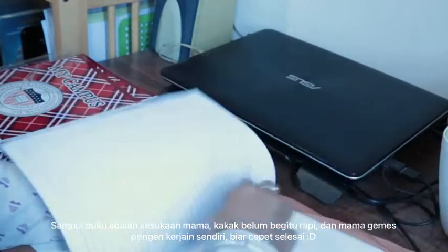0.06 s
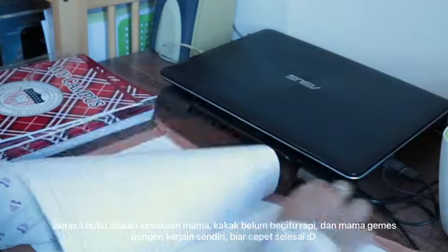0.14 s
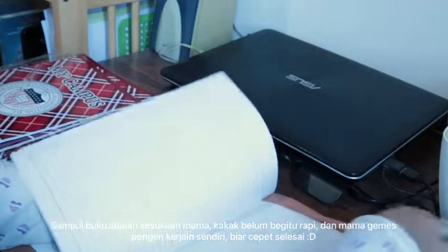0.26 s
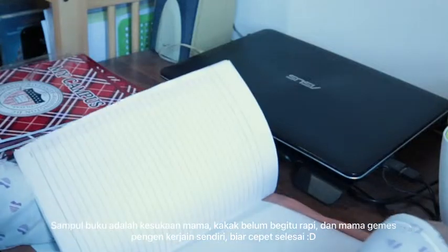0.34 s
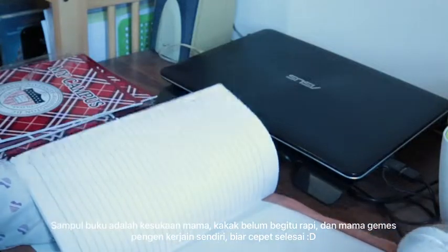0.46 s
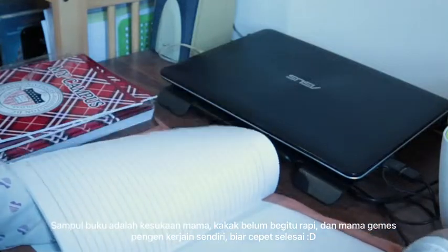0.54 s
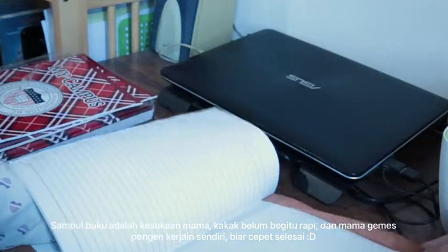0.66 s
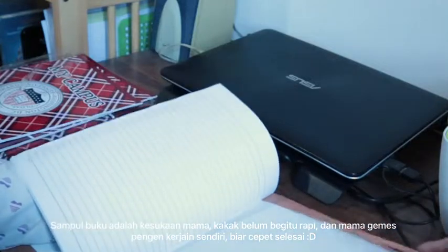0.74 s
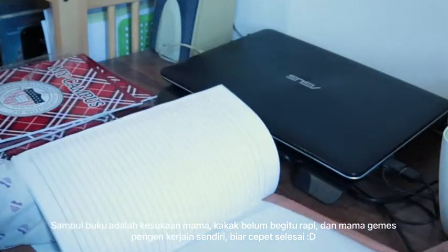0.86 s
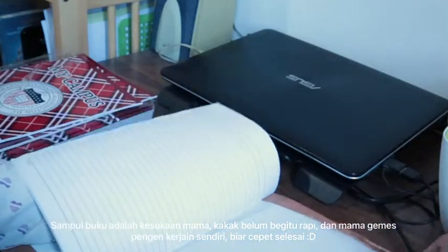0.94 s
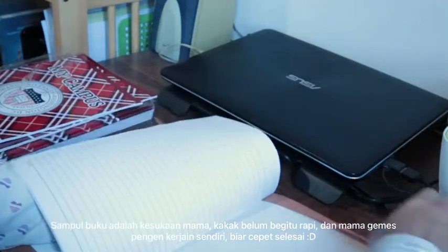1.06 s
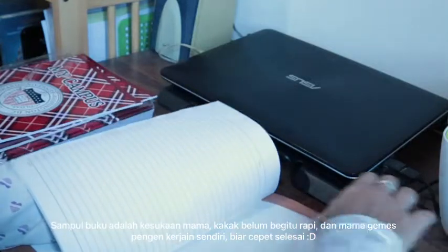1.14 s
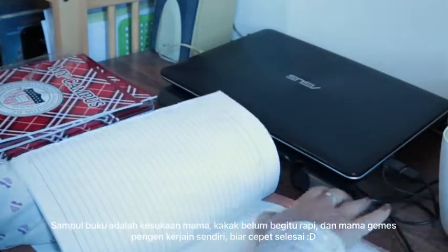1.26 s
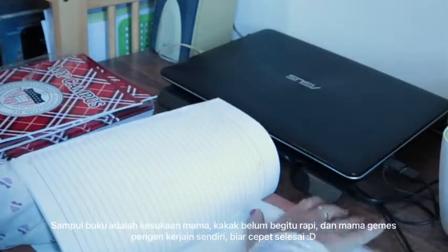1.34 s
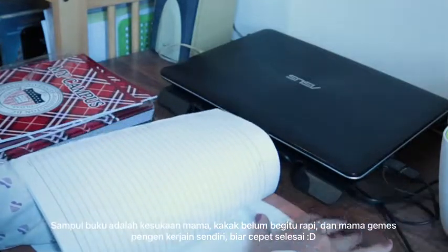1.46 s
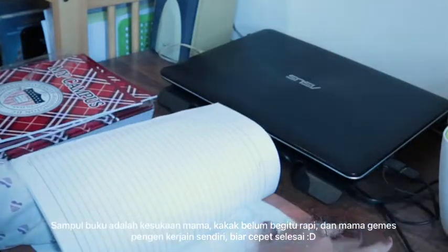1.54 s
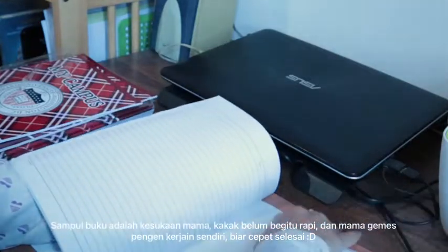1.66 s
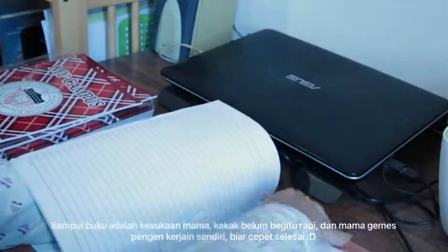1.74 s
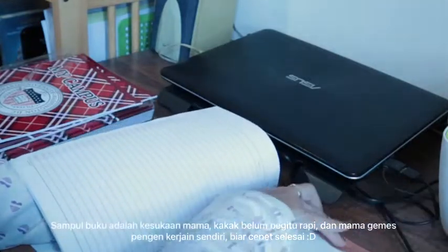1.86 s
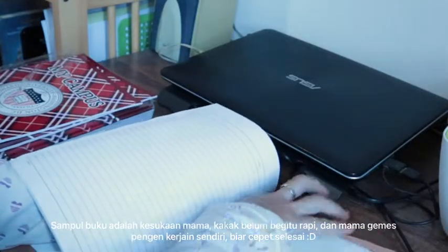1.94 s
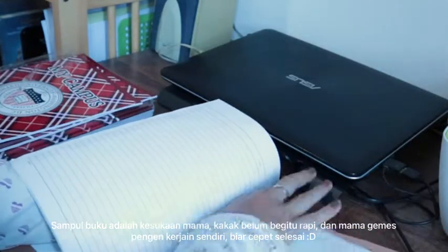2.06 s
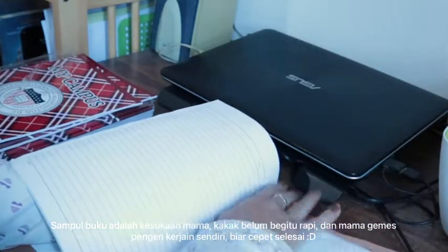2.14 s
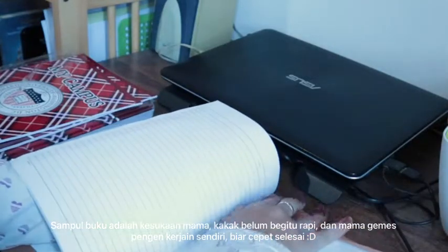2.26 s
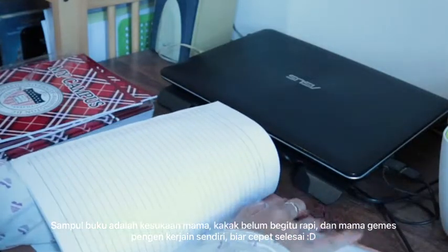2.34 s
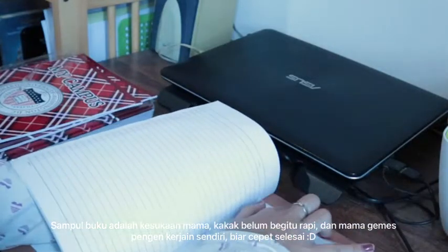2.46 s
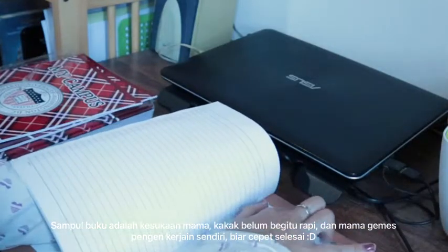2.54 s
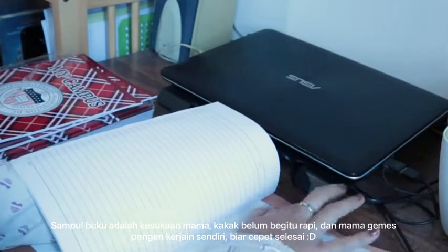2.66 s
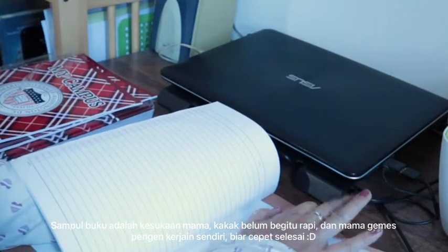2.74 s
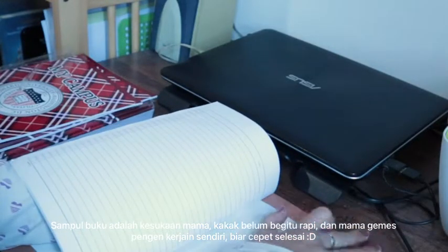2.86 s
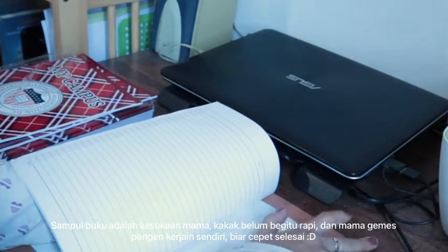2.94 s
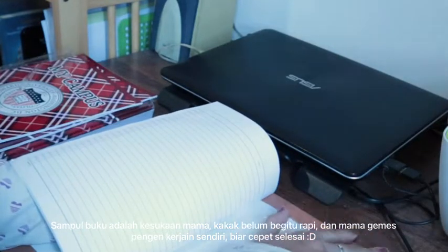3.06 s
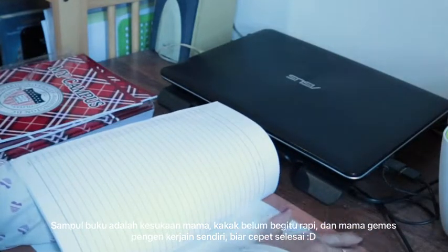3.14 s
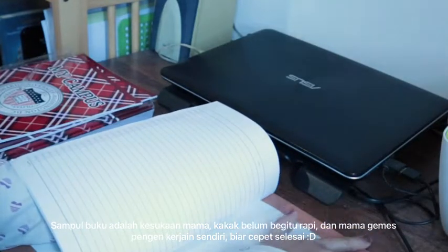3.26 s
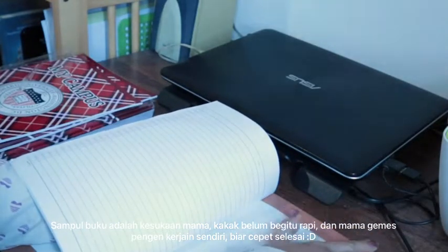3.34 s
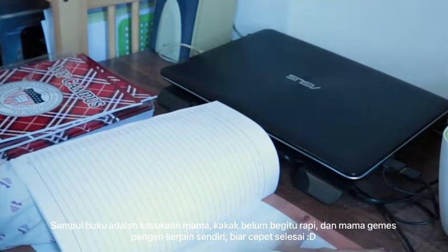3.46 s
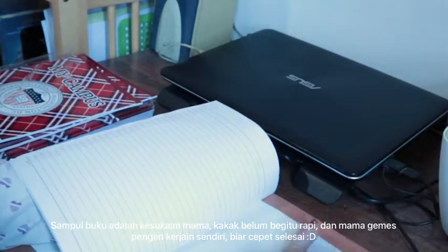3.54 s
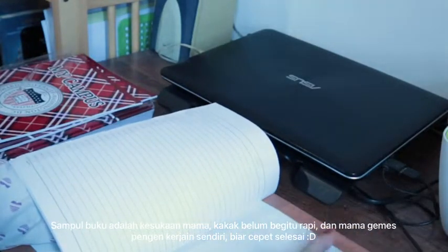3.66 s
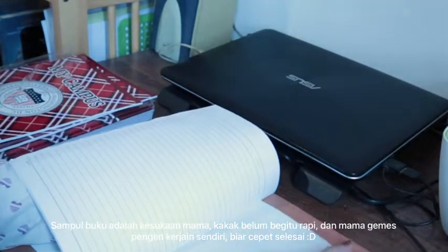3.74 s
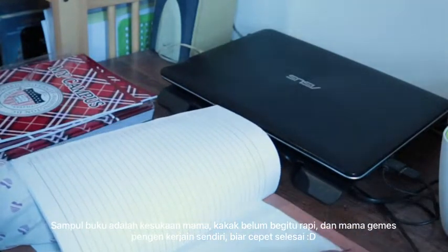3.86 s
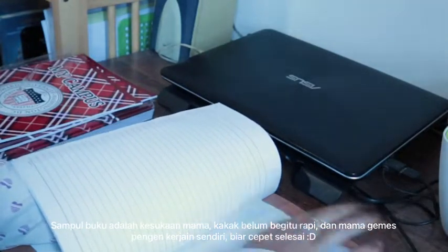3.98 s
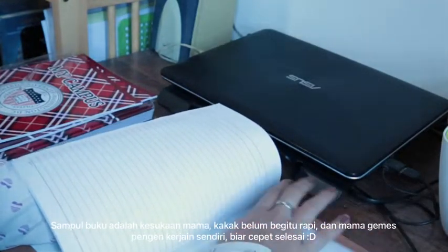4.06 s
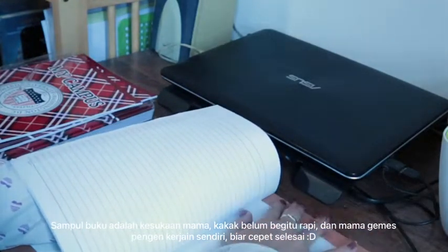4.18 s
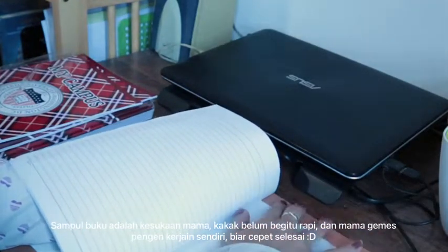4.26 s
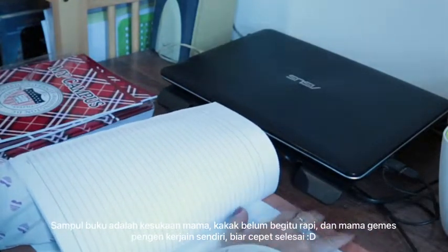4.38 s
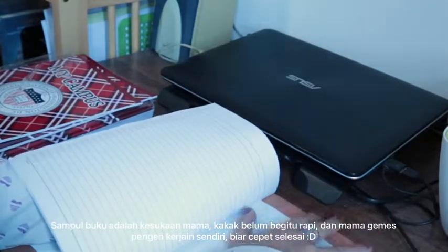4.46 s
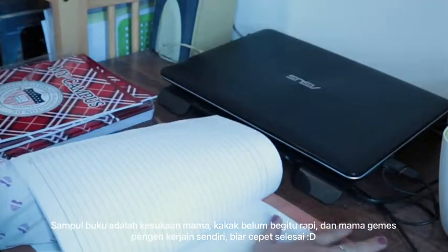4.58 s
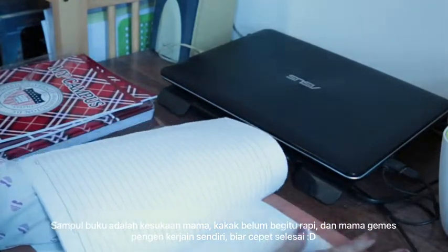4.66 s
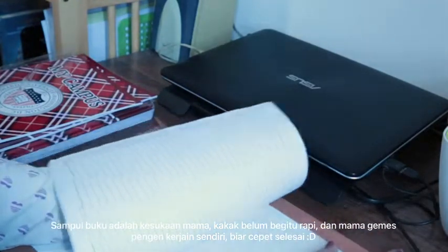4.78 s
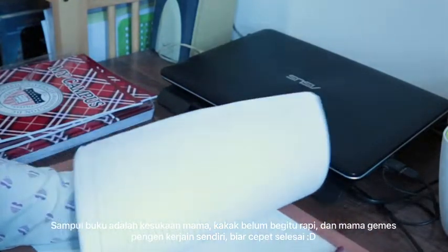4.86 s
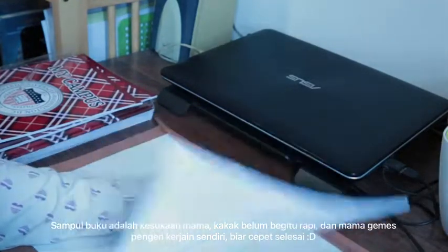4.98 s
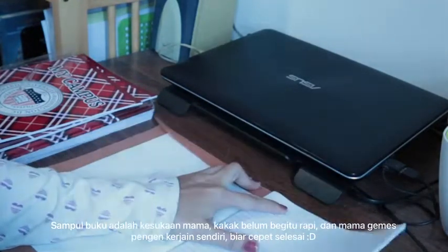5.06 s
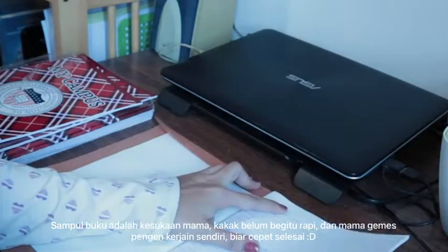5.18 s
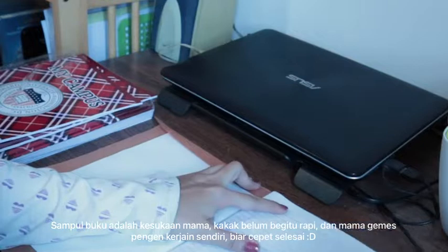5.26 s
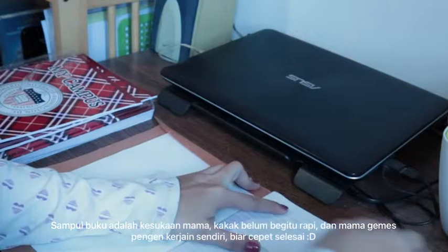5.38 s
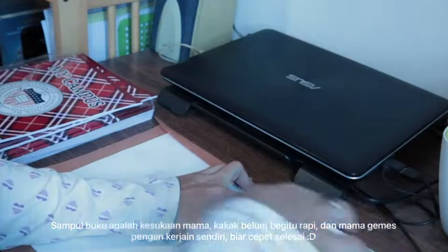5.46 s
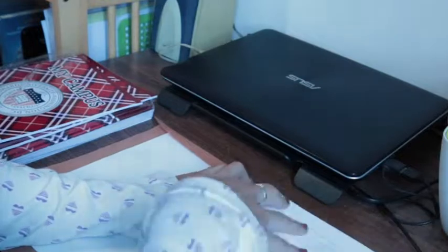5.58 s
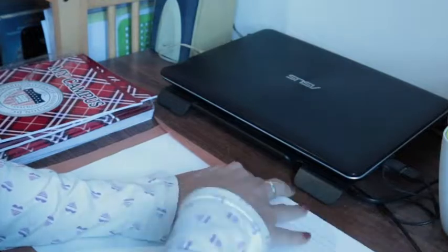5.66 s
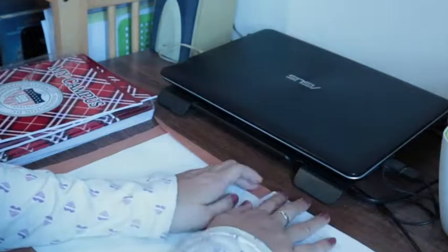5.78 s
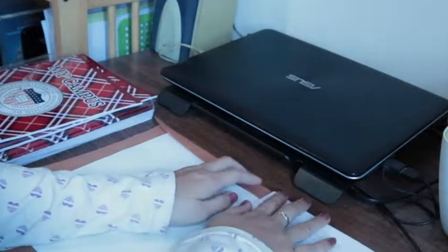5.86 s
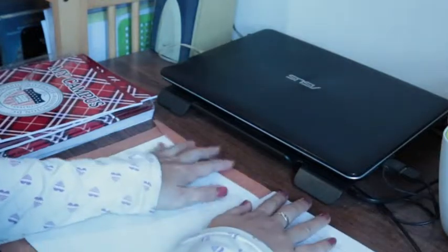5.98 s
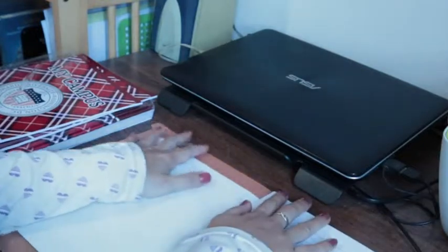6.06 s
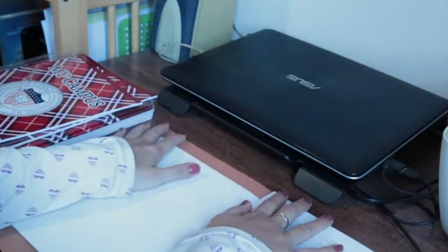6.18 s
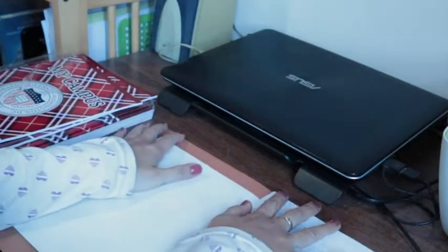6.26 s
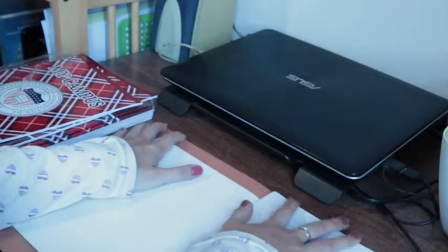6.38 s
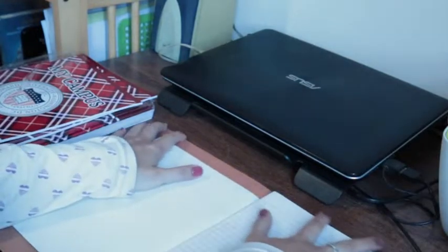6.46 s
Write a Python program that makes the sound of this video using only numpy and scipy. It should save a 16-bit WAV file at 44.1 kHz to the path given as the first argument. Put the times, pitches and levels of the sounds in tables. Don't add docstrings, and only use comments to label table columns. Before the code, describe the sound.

Close up, sheets of paper rustle, crackle and pop under moving hands, then a notebook slaps down on a wooden desk and palms smooth it.

```python
import sys
import numpy as np
from scipy import signal
from scipy.fft import rfft, irfft, next_fast_len
from scipy.io import wavfile
from scipy.ndimage import uniform_filter1d

SR = 44100
rng = np.random.default_rng(int(sys.argv[2]) if len(sys.argv) > 2 else 0)


def ratio(d):
    e = np.asarray(d, float) / 20
    return 10 ** e


def inscribe(sig):
    pcm = np.round(np.clip(np.atleast_2d(sig).T, -1, 1) * 32767)
    wavfile.write(sys.argv[1], SR, pcm.astype(np.int16))


N = 287091
STEP = 32

# [f/Hz, density/dB per Hz]
HUM_SPECTRUM = [(18, -38), (30, -12), (83, -1.5), (337, -3.5), (394, -3.5), (928, -13), (1870, -18),
                (3320, -22), (8040, -30), (11600, -34), (12500, -35), (13500, -61), (15000, -78)]
HUM_DB = -49
# [f/Hz, density/dB per Hz]
SHEET_SPECTRUM = [(700, -48), (1200, -5.5), (2000, -1), (3000, -3.5), (4000, -15), (5500, -36)]
FINE_SPECTRUM = [(4500, -9), (6500, -14.5), (8500, -11), (11200, -9), (12800, -15), (14300, -24.5),
                 (15300, -40)]
FLUTTER_SPECTRUM = [(150, 3.5), (300, 0.5), (700, -3), (1100, -5.5), (1500, -77)]
EDGE_SPECTRUM = [(2800, 2.5), (3800, 5.5), (5000, 0), (6500, -4), (8000, -14)]

# [start t/s, rise/s, fall/s, top level/dB, brightness/dB]
SWEEPS = [(0.0, 0.0025, 0.37, -40.5, -8), (.3, 0.18, 0.24, -51, -15), (.85, 0.085, 0.033, -39, -11),
          (1.1, 0.22, 0.22, -45.5, -27), (1.5, 0.27, 0.33, -45, -23), (1.78, 0.067, .05, -54.5, -0.5),
          (1.999, 0.012, 0.022, -52, 0.5), (2.2, 0.067, 0.066, -58.5, 6.5), (2.33, 0.076, 0.13, -52.5, -2),
          (2.48, 0.11, 0.16, -49.5, -5), (3.4, 0.14, 0.24, -46.5, -17), (3.62, .09, 0.058, -47.5, -6.5),
          (4.25, 0.21, .2, -50.5, -2), (4.5, .21, .1, -41.5, -4.5), (4.72, 0.11, 0.2, -48.5, -6.5),
          (5.42, 0.15, 0.13, -78, -19), (2.03, 0.093, 0.12, -52, -9), (5.1, 0.14, 0.14, -43.5, -22),
          (5.22, .13, 0.058, -51, 1), (5.62, 0.049, 0.093, -53, -6.5), (5.7, 0.064, 0.047, -50, -3.5),
          (5.849, 0.11, 0.18, -47.5, 2.5), (5.95, 0.17, 0.071, -49, -2), (6.26, 0.25, 0.37, -45.5, -3.5)]
# [start t/s, fall/s, top level/dB, brightness/dB]
CRUMPLES = [(0.108, 0.087, -38, -6.5), (.25, 0.11, -40, -3), (.57, 0.053, -39.5, -6.5),
            (.62, 0.16, -35, -16), (0.652, 0.08, -31, -4), (1.104, 0.17, -43.5, -7),
            (1.321, 0.27, -40, -7.5), (1.46, .12, -47, -2.5), (1.87, 0.09, -42.5, -8),
            (2.129, 0.2, -45.5, -3.5), (2.79, 0.97, -49.5, 0.5), (3.128, 0.93, -47.5, -1.5),
            (3.34, 0.15, -43.5, 0), (3.862, 0.11, -34.5, -20.5), (4.141, 0.056, -38.5, -9),
            (4.26, 0.14, -51.5, -3), (5.05, 0.13, -35, -31), (1.915, 0.016, -41, -14),
            (5.755, 0.16, -44.5, -28)]
# [start t/s, fall/s, top level/dB]
FLAPS = [(.17, 0.14, -37), (.29, 0.24, -42.5), (.45, 0.11, -42), (2.802, 0.41, -50), (3.55, 0.093, -43.5),
         (3.864, 0.075, -43), (4.15, 0.11, -40.5), (5.035, 0.033, -38), (5.75, 0.097, -34),
         (6.2, 0.26, -55), (2.2, 0.29, -53), (3.65, 0.28, -47), (4.3, 0.51, -47.5)]
REST_DB, REST_BRIGHT_DB = -67, -3.5
SPAN_DB, BUCKLE_RISE_S = 12.5, 0.012
SWEEP_HOLD = 2
SWEEP_CRACKLE, CRUMPLE_CRACKLE = 0.25, 0.36
EDGE_DB, EDGE_SLOPE, FLUTTER_DB = 1, 0.53, -5.5
WANDER_DB = 2.2

# [t/s, peak level/dB, panel f/Hz, length/ms]
POPS = [(.023, -30, 2570, 11), (.146, -19.5, 1240, 18), (.235, -22, 2480, 18), (.298, -21, 3020, 7.7),
        (.673, -21, 1580, 25), (.7255, -7, 2300, 8), (1.308, -27, 2530, 14), (1.869, -17, 1760, 11),
        (1.92, -24, 2130, 9.6), (2.807, -22.5, 1480, 8.9), (3.505, -30, 2820, 6.8), (3.866, -6, 2460, 9.5),
        (4.141, -31, 2140, 9.6), (5.227, -23, 2100, 8.1)]
# [t/s, peak level/dB, panel f/Hz, length/ms]
FOLDS = [(.272, -29, 2950, 38), (.501, -23, 1370, 18), (.513, -26, 1430, 25), (.632, -17.5, 1730, 14),
         (.66, -12, 1800, 15), (.694, -18, 1490, 12), (1.069, -33.5, 1540, 15), (1.164, -29.5, 1410, 11),
         (1.272, -30, 2000, 9), (1.326, -21, 1700, 9), (1.34, -18, 2080, 12), (1.373, -19.5, 1670, 8),
         (.12, -22, 900, 8.5), (2.034, -33.5, 1580, 6.7), (2.164, -31, 1600, 14), (2.458, -32, 1350, 7.4),
         (2.498, -30.5, 3500, 8.3), (2.9085, -32, 3400, 6), (2.938, -33, 2080, 6.1),
         (3.034, -29, 3060, 6.9), (3.185, -24, 2920, 8), (3.203, -25, 3400, 5.4), (3.275, -28, 3730, 6.9),
         (3.295, -24, 3450, 9.1), (3.428, -29, 3120, 19), (1.385, -25, 3000, 7.4), (1.482, -22.5, 2300, 14),
         (1.932, -25, 2915, 4.4), (4.8025, -15.5, 2930, 5), (3.61, -29, 3500, 6), (2.431, -38, 1630, 6),
         (1.246, -28, 2700, 7), (1.309, -28, 3400, 6), (1.382, -22, 3900, 8), (.738, -23, 2300, 8),
         (.752, -24, 1990, 10), (.768, -25, 1800, 7.4)]
# [t/s, peak level/dB, panel f/Hz, length/ms]
CRISP = [(.123, -23, 1480, 19), (.584, -25.5, 2820, 14), (.939, -19, 2190, 6), (.726, -10.5, 2590, 5),
         (1.108, -30, 1590, 28), (1.403, -17, 2180, 9.4), (1.503, -21, 2040, 12), (1.621, -28, 2300, 38),
         (2.419, -25, 1750, 11), (2.602, -21.5, 1480, 13.5), (2.7925, -24.5, 1650, 9.6),
         (2.832, -19.5, 3480, 10.4), (2.883, -24, 2020, 16), (2.9625, -17.5, 2220, 7),
         (3.128, -23, 2400, 8.8), (3.136, -27, 3000, 8.3), (3.25, -25.5, 1910, 9), (3.312, -21.5, 1970, 7),
         (3.341, -15.5, 3640, 9.3), (3.367, -19.5, 3880, 17), (4.157, -25, 1770, 19), (5.371, -28, 2600, 8),
         (3.8663, -15, 3300, 3.6), (2.602, -28, 900, 7.7), (3.558, -27, 2200, 6.7), (5.878, -25, 880, 4.1)]
# [t/s, peak level/dB, panel f/Hz, length/ms]
TICKS = [(.110, -28, 2900, 10), (.129, -28, 2300, 8), (.246, -31, 2300, 8), (.283, -22, 2900, 14),
         (.3675, -34, 1450, 7), (.385, -35, 1448, 6), (.576, -34, 1930, 6), (.6245, -23, 1630, 5.7),
         (.648, -20, 1500, 8), (.676, -18, 2500, 7.1), (.687, -20, 1900, 7), (.8687, -36, 1940, 8),
         (.906, -29, 2290, 9), (.927, -26, 3770, 8), (.9805, -37, 1690, 6), (1.034, -35.5, 1630, 6),
         (1.0855, -39, 1630, 6), (1.47, -24, 2300, 5), (1.364, -28, 2500, 6), (1.379, -24, 2020, 10),
         (1.449, -32, 2300, 5), (1.911, -30, 2500, 6.1), (2.018, -39, 3300, 5), (2.0685, -39, 2290, 7),
         (2.15, -32.5, 3300, 10), (2.18, -34, 1590, 7), (2.2995, -33.5, 2290, 6), (5.64, -31.5, 1520, 8),
         (2.613, -32, 1630, 7), (2.8935, -34, 1930, 6.5), (2.963, -20, 2130, 6.9), (3.174, -26, 2630, 8),
         (3.192, -28, 3300, 6), (3.2135, -26, 2720, 8), (3.2575, -32, 1640, 6.3), (3.319, -36, 2200, 6),
         (3.35, -22, 4100, 5), (3.384, -23, 3300, 6.6), (3.405, -29, 2200, 8), (3.4945, -28, 2800, 6),
         (3.65, -35, 1930, 7), (3.809, -35.5, 2290, 6), (4.163, -31, 1930, 6.5), (4.401, -35, 3180, 6),
         (4.539, -35, 3200, 5.5), (4.635, -32, 2300, 7), (4.983, -40, 2700, 6), (5.203, -26, 2380, 7.7),
         (5.245, -28.5, 1350, 6.4), (5.337, -32.5, 1650, 6.6)]
# [t/s, peak level/dB, panel f/Hz, length/ms]
KNOCKS = [
    (1.221, -25, 930, 8.7),
    (3.558, -24, 910, 8.9),
    (4.1, -32, 900, 9.8),
    (5.749, -28, 1400, 13),
    (5.762, -19.5, 1800, 7.7),
    (5.768, -21.5, 1230, 22),
    (.448, -15.5, 1770, 8.4),
    (.299, -24, 530, 11.3),
]
# [t/s, peak level/dB, panel f/Hz, length/ms]
SLAP = [(5.0271, -13, 2600, 3), (5.029, -1, 2490, 3.5), (5.0315, -0.5, 2200, 3.5), (5.0331, -10, 2200, 4),
        (5.036, -7, 2500, 4), (5.0385, -9.5, 2760, 7.5), (5.0498, -12, 1920, 5.2),
        (5.0604, -11.5, 900, 3.9), (5.062, -11, 1880, 7), (5.0415, -10, 2900, 5.9),
        (5.083, -22.5, 1200, 4.5), (5.085, -20, 2400, 5)]
# [treble/dB, body re panel/dB, first break/1, panel width re pitch/1]
POP_TONE = (-40, -11.5, 1.7, 1)
FOLD_TONE = (-36.5, -38, 0.9, 0.73)
CRISP_TONE = (-6, -32, 1.02, 0.96)
TICK_TONE = (-95, -45, .3, .27)
KNOCK_TONE = (-57, -14, .7, 0.82)
SLAP_TONE = (-50, -18.5, 2, 0.53)
RAGGED = 0.8

# [t/s, peak level/dB, f/Hz, t60/s]
THUMPS = [(0.119, -33.5, 100, 0.13), (0.181, -26.5, 334, 0.053), (.298, -22, 347, 0.033),
          (0.306, -32, 111, 0.27), (.316, -29.5, 304, 0.083), (1.391, -40, 242, 0.082),
          (2.79, -29.5, 145.8, 0.23), (3.556, -37, 256, 0.1), (3.881, -46.5, 109, 0.15),
          (4.16, -29, 109, 0.2), (4.197, -31, 105, 0.15), (5.03, -13, 473, 0.013), (5.031, -20, 270, 0.033),
          (5.773, -32, 350, 0.13), (5.765, -32, 160, .06), (5.781, -26, 103, 0.15), (5.857, -29, 120, 0.05),
          (5.838, -25.5, 100, 0.19), (5.874, -26.5, 130, 0.073), (5.899, -31, 84, 0.11),
          (5.921, -42, 89, 0.11)]
# [multiple of the pitch/1, level/dB]
DESK_MODES = [(1, -1), (1.5, -10.5), (2.3, -10), (.55, -23)]
# [start t/s, fall/s, top level/dB]
LEANS = [
    (.25, 0.32, -59),
    (1.86, 0.1, -43),
    (2.1, 0.26, -40.5),
    (2.76, 0.11, -44),
    (3.85, .15, -41),
    (4.14, 0.32, -42),
    (4.99, 0.12, -36.5),
    (5.73, 0.33, -34.5),
    (5.95, 0.24, -45),
]
# [f/Hz, density/dB per Hz]
RUMBLE_SPECTRUM = [(25, -44), (45, 1), (80, -6.5), (108, 2.5), (140, -21.5), (200, -9)]
LEAN_RISE_S, SHAKE_DB = 0.048, -51
# [f/Hz, level/dB, t60/s]
COVER_MODES = [(487, 5.5, 0.043), (771, 5.5, 0.084), (1267, 10.5, 0.03), (1880, -4, 0.15), (2080, 8, 0.03),
               (2200, -5, 0.11), (2820, -10, 0.18), (3240, -10.5, 0.22)]
COVER_DB = -11

# [f/Hz, t60/s]
ROOM_T60 = [(200, 0.12), (1000, 0.46), (3000, 0.17), (6000, 0.48), (12000, 0.07)]
ROOM_DB = -9.5
# [f/Hz, likeness/1]
PORT_LIKENESS = [(60, .998), (200, 0.97), (600, 0.89), (1500, 0.92), (3000, 0.92), (4200, 0.65),
                 (5500, 0.41), (8000, 0.51), (14000, 0.22)]
# [f/Hz, phase/rad]
PORT_LEAD = [(60, 0), (600, .15), (2000, .2), (3400, 0), (4650, -.6), (6460, -3), (9000, -3), (11500, -1.5),
             (13000, -3), (15000, -3)]
# [f/Hz, level/dB]
PORT_LEAN = [(60, 0), (180, 0), (550, 0), (1650, -1.5), (4970, -1.0), (15000, -2)]
TOP_HZ = 15400
HOLE_HZ, HOLE_DB, HOLE_DEPTH_DB = 5200, -1.9, -18


def evened(x):
    return x / np.sqrt(np.mean(x ** 2) + 1e-20)


def read(points, hz):
    f, value = np.transpose(points)
    return np.interp(np.log(hz + 1), np.log(f + 1), value)


def coloured(x, spectrum):
    size = next_fast_len(N)
    hz = np.fft.rfftfreq(size, 1 / SR)
    inside = (hz > spectrum[0][0]) & (hz < spectrum[-1][0])
    gain = ratio(read(spectrum, hz)) * inside
    return evened(irfft(rfft(x, size) * gain, size)[:, :N])


def add(mix, start_s, sound):
    part = mix[:, round(start_s * SR):][:, :sound.shape[1]]
    part += sound[:, :part.shape[1]]


def gesture(start_s, rise_s, fall_s, top_db, hold=1):
    t = np.arange(0, N + STEP, STEP) / SR - start_s - rise_s
    away = np.maximum(-t / max(rise_s, 0.003), t / max(fall_s, 0.01))
    return ratio(top_db - SPAN_DB * np.minimum(away, 9) ** hold) ** 2


def filled(v):
    return np.interp(np.arange(N) / STEP, np.arange(len(v)), v)


def hum():
    swell = evened(uniform_filter1d(uniform_filter1d(rng.standard_normal(N), 6000), 6000))
    return ratio(HUM_DB + 1.9 * swell) * coloured(rng.standard_normal((2, N)), HUM_SPECTRUM)


def crackle(count=16):
    happens = rng.random(N) < 900 / SR
    size = ratio(4.5 * np.minimum(rng.exponential(1, N), 2.4)) * happens
    patch = rng.integers(0, count, N)
    t, out = np.arange(400) / SR, np.zeros((2, N))
    for k, hz in enumerate(np.geomspace(1100, 4300, count)):
        turns = hz * t / 4.25
        grain = turns * np.exp(-turns * 1.72) * np.sin(2 * np.pi * (hz * t + rng.random((2, 1))))
        rung = signal.oaconvolve((size * (patch == k))[None], grain, axes=1)[:, :N]
        out += ratio(read(SHEET_SPECTRUM, hz)) * hz * rung
    return evened(out)


def wandering(x):
    z = signal.stft(x, nperseg=512)[2]
    patches = uniform_filter1d(rng.standard_normal(z.shape[1:]), size=7, axis=0)
    patches = uniform_filter1d(patches, size=14, axis=1)
    return evened(signal.istft(z * ratio(WANDER_DB * evened(patches)), nperseg=512)[1][:, :N])


def rub():
    moves = [(ratio(REST_DB) ** 2, REST_BRIGHT_DB, SWEEP_CRACKLE)]
    for s, rise, fall, db, bright_db in SWEEPS:
        moves.append((gesture(s, rise, fall, db, SWEEP_HOLD), bright_db, SWEEP_CRACKLE))
    for s, fall, db, bright_db in CRUMPLES:
        moves.append((gesture(s, BUCKLE_RISE_S, fall, db), bright_db, CRUMPLE_CRACKLE))
    air = sum(gesture(s, BUCKLE_RISE_S, fall, db) for s, fall, db in FLAPS)

    power = sum(p for p, _, _ in moves)
    share = np.clip(sum(p * c for p, _, c in moves) / power, 0, 1)
    fine = np.sqrt(sum(p * ratio(db) ** 2 for p, db, _ in moves))
    edge = np.sqrt(sum(p * ratio(EDGE_DB + EDGE_SLOPE * db) ** 2 for p, db, _ in moves))
    flutter = np.sqrt(power * ratio(FLUTTER_DB) ** 2 + air)
    power, share, fine, edge, flutter = map(filled, (power, share, fine, edge, flutter))

    clumps = evened(uniform_filter1d(rng.standard_normal(N), 700))
    grains = crackle()
    smooth_part, grain_part = np.sqrt(1 - share), np.sqrt(share)
    gusts = smooth_part + grain_part * evened(uniform_filter1d(abs(grains[0]), 60))
    layers = [(EDGE_SPECTRUM, edge), (FINE_SPECTRUM, fine), (FLUTTER_SPECTRUM, flutter)]
    hiss = sum(level * coloured(gusts * rng.standard_normal((2, N)), s) for s, level in layers)
    smooth = wandering(coloured(rng.standard_normal((2, N)), SHEET_SPECTRUM))
    sheet = smooth_part * smooth + grain_part * grains
    return ratio(0.33 * clumps) * (1.09 * np.sqrt(power) * sheet + hiss)


def causal(colour):
    log_gain = np.log(colour + 1e-5)
    mirrored = np.r_[log_gain, log_gain[-2:0:-1]]
    return colour * np.exp(-1j * signal.hilbert(mirrored).imag[:len(colour)])


def snap(noise, db, hz, ms, treble_db, body_db, first, width):
    t = np.arange(noise.shape[1]) / SR
    f = np.fft.rfftfreq(noise.shape[1], 1 / SR)
    gone = t / (max(ms, 1.5) / 1000)
    burst = noise * abs(noise) ** RAGGED * (1 - np.exp(-gone / 0.3)) * ratio(-26 * gone)
    burst = burst + first * np.exp(-((t - 0.001) * SR / 1.58) ** 2)

    wide = ratio(0.32 * treble_db + 1)
    panel = 1 / (1 + ((f - hz) / (width * hz)) ** 2) ** 2
    panel = panel + wide * ratio(read(SHEET_SPECTRUM, f))
    body = ratio(body_db + 4.5 + read(FLUTTER_SPECTRUM, f)) * (f < 1500)
    panel = (panel + body) / (1 + (280 / (f + 1)) ** 3)

    bright = 0.7 * wide * ratio(read(EDGE_SPECTRUM, f)) * (f > 2800)
    bright = bright + ratio(treble_db + 12.0 + read(FINE_SPECTRUM, f))
    crack = burst * ratio(-14 * gone)
    sound = irfft(rfft(burst) * causal(panel) + rfft(crack) * causal(bright))
    return ratio(db) * sound / abs(sound).max(1, keepdims=True)


def creases():
    kinds = [(SLAP, SLAP_TONE), (POPS, POP_TONE), (CRISP, CRISP_TONE),
             (FOLDS, FOLD_TONE), (KNOCKS, KNOCK_TONE), (TICKS, TICK_TONE)]
    out = np.zeros((2, N))
    for rows, tone in kinds:
        for s, *row in rows:
            add(out, s - 0.001, snap(rng.standard_normal((2, 2048)), *row, *tone))
    return out


def desk():
    t, out = np.arange(12000) / SR, np.zeros((2, N))
    for s, db, hz, t60 in THUMPS:
        ring = np.zeros(len(t))
        for k, mode_db in DESK_MODES:
            decay = ratio(mode_db - 60 * t * k ** 0.5 / t60)
            ring += decay * np.sin(2 * np.pi * (k * hz * t + rng.random()))
        ring *= 1 - np.exp(-t / 0.00055)
        add(out, s, ratio(db) * np.array([ring, ring]) / abs(ring).max())
    return out


def shake():
    power = ratio(SHAKE_DB) ** 2 + sum(gesture(s, LEAN_RISE_S, fall, db) for s, fall, db in LEANS)
    return ratio(-3.0) * np.sqrt(filled(power)) * coloured(rng.standard_normal((2, N)), RUMBLE_SPECTRUM)


def cover():
    t, out = np.arange(12000) / SR, np.zeros((2, N))
    ring = sum(ratio(db - 60 * t / t60) * np.sin(2 * np.pi * hz * t) for hz, db, t60 in COVER_MODES)
    ring = ring * (1 - np.exp(-t / 0.0012))
    impact_s = SLAP[2][0]
    add(out, impact_s, ratio(COVER_DB) * np.array([ring, ring]) / abs(ring).max())
    return out


def room(x):
    taps = np.zeros((2, SR // 2))
    at = np.arange(120, SR // 2 - 20, 20) + rng.integers(0, 20, (2, (SR // 2 - 121) // 20))
    np.put_along_axis(taps, at, rng.choice([-1., 1.], at.shape), 1)
    hz, t, z = signal.stft(taps, SR, nperseg=256)
    decay = ratio(-60 * t / read(ROOM_T60, hz)[:, None])
    tail = signal.istft(z * decay, SR, nperseg=256)[1]
    return signal.fftconvolve(x, tail / np.linalg.norm(tail[0]), axes=1)[:, :N]


def ports(x, spread):
    size = next_fast_len(N)
    hz = np.fft.rfftfreq(size, 1 / SR)
    same = np.clip(read(PORT_LIKENESS, hz), 0, 1) ** spread
    left, other = rfft(x, size)
    right = (same * left + np.sqrt(1 - same ** 2) * other) * np.exp(-1j * read(PORT_LEAD, hz))
    lean = ratio(read(PORT_LEAN, hz) / 2)
    return irfft(np.array([left * lean, right / lean]) * (hz < TOP_HZ), size)[:, :N]


def scene():
    hits = creases() + desk() + cover()
    hands = rub()
    near = ports(hits + shake(), spread=0.41) + ports(hands, spread=2.04)
    return near + ports(ratio(ROOM_DB) * room(hits + hands) + hum(), spread=7.2)


def gate(x):
    mid, side = (x[0] + x[1]) / 2, (x[0] - x[1]) / 2
    hz, _, z = signal.stft(mid, SR, nperseg=1024, noverlap=768)
    cell = uniform_filter1d(uniform_filter1d(abs(z) ** 2, size=4, axis=0), size=6, axis=1)
    around = uniform_filter1d(cell, size=60, axis=0)
    under_db = HOLE_DB - 10 * np.log10(abs(cell / (around + 1e-20)) + 1e-9)
    treble = np.clip(hz / HOLE_HZ - 0.5, 0, 1)[:, None] ** 2
    z = z * ratio(HOLE_DEPTH_DB * np.clip(under_db, 0, 1) * treble)
    mid = signal.istft(z, SR, nperseg=1024, noverlap=768)[1][:N]
    return np.array([mid + side, mid - side])


def top_cut(x):
    return signal.sosfilt(signal.butter(12, 15680, fs=SR, output="sos"), x)


def record(dry):
    mix = gate(np.clip(dry, -1, 1))
    return top_cut(mix)


dry = scene()
out = record(dry)
inscribe(out)
```